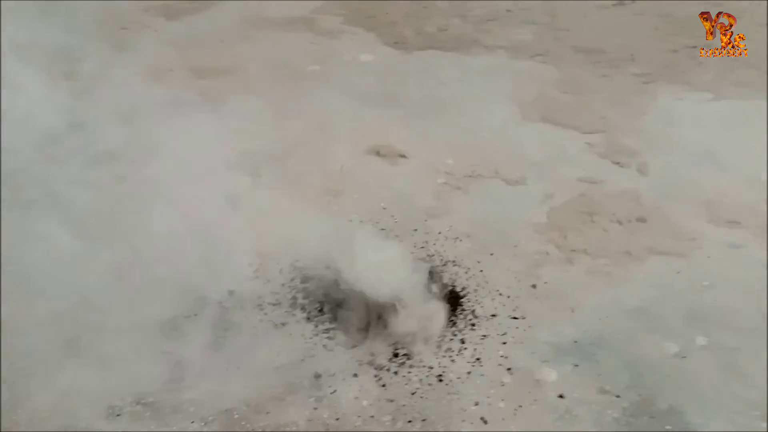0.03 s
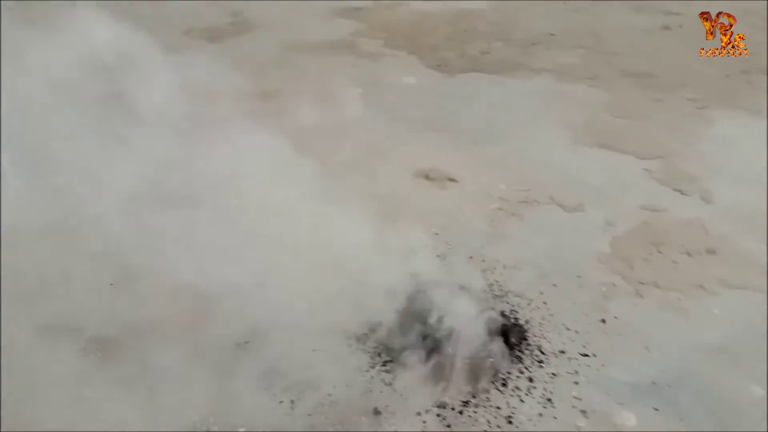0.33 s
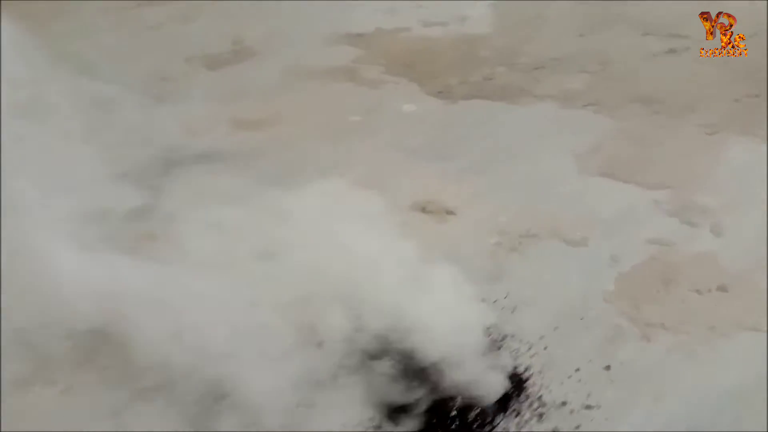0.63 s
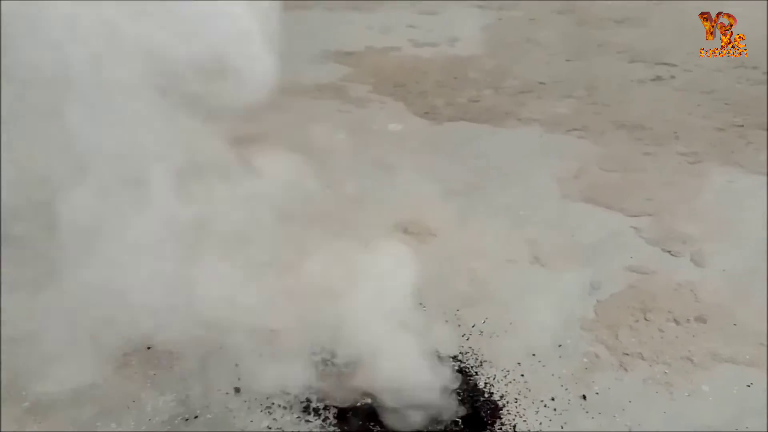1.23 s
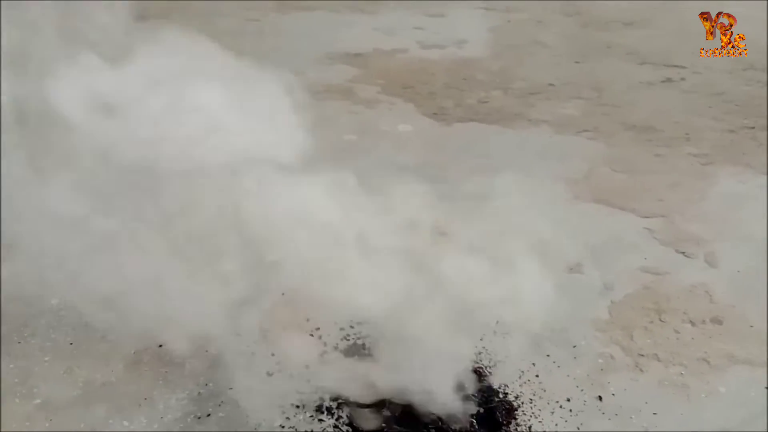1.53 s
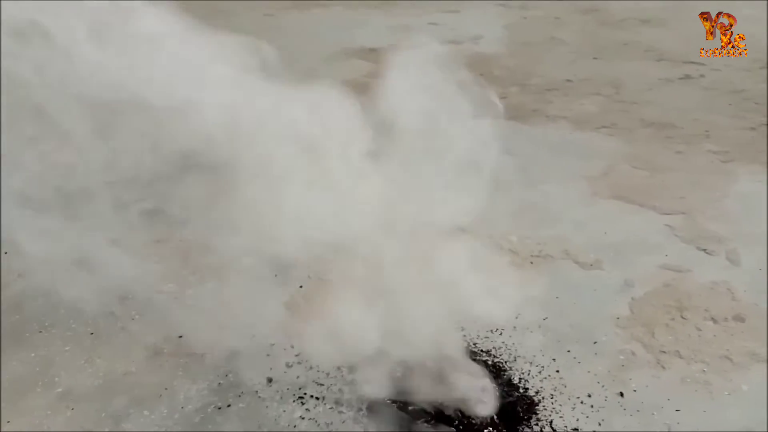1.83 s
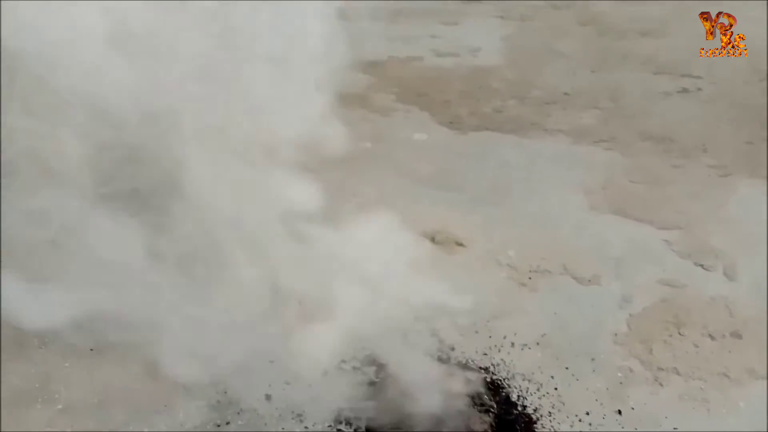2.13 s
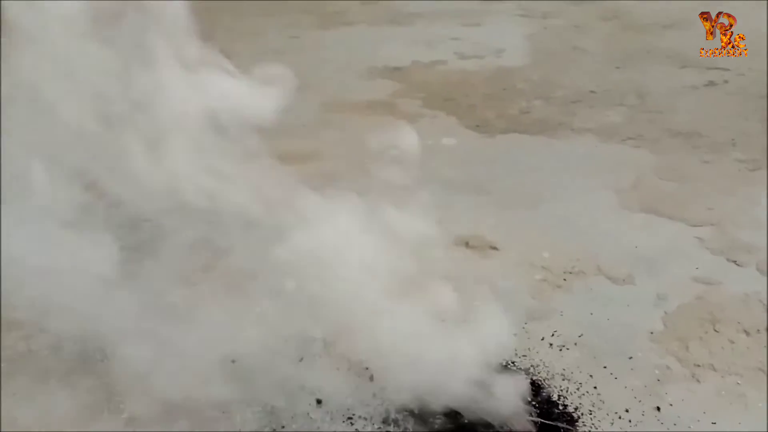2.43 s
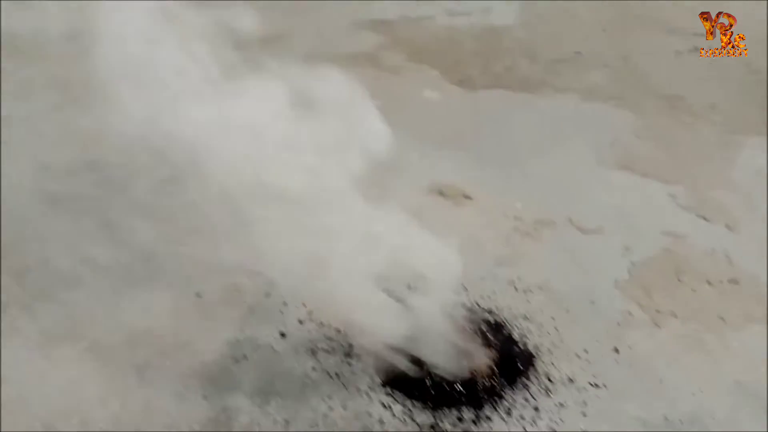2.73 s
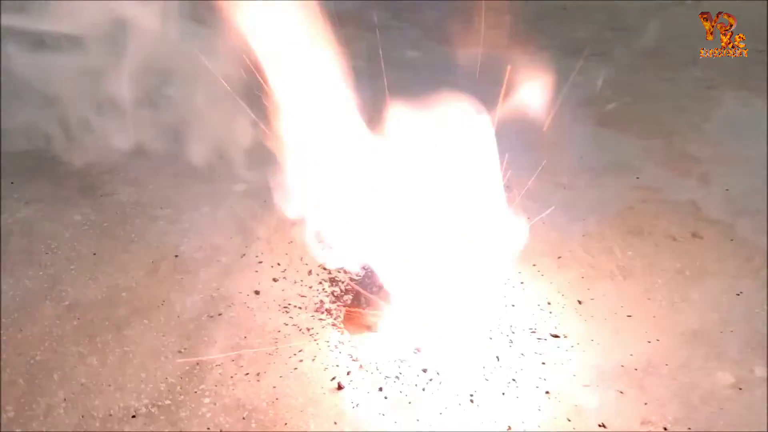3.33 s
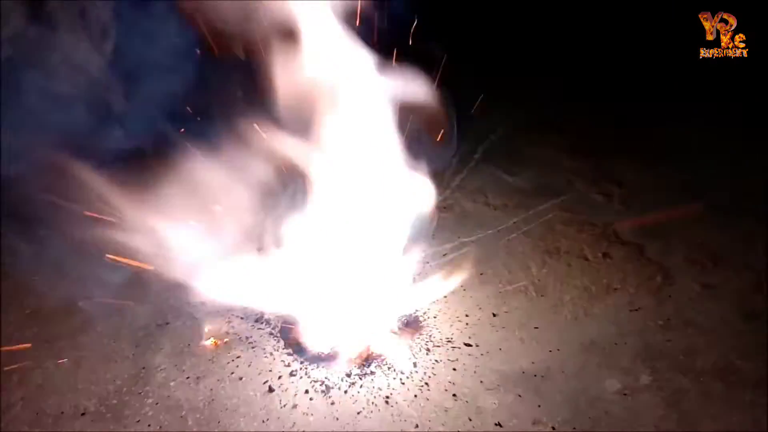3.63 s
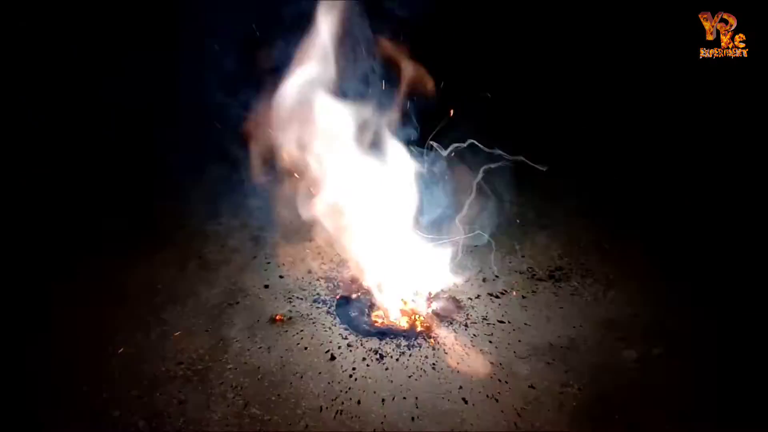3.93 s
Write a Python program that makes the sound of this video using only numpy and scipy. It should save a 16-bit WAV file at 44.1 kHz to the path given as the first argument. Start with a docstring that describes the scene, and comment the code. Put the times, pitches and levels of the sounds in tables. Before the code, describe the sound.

A reacting chemical pile sizzles close to the microphone on a concrete floor, hissing in spurts while bubbles crackle and pop. Near the end it catches fire, roaring in surges with crackling sparks and a low rumble.

```python
"""A reacting chemical pile seethes close by on a concrete floor, spitting gas in spurts.
Its froth sizzles, tiny bubbles crackle, and bigger ones burst with sharp pops, a few with a thump.
Just after three seconds it catches fire: burning gas roars in surges and throws crackling sparks.
Behind it are a fine fizz, a low rumble of churning air and flame, and a faint echo."""
import sys
import numpy as np
from scipy import signal
from scipy.fft import rfft, irfft
from scipy.io import wavfile

SR = 44100
rng = np.random.default_rng(int(sys.argv[2]) if len(sys.argv) > 2 else 0)


def wrap_up_sound(samples):
    """Save the sound to the file named by the first command line argument, as 16-bit audio."""
    columns = np.atleast_2d(samples).T
    # keep every value between -1 and 1, then stretch to whole-number steps
    tamed = np.clip(columns, -1, 1)
    steps = np.round(tamed * 32767).astype(np.int16)
    wavfile.write(sys.argv[1], SR, steps)


N = 176400
TIME = np.arange(N) / SR   # seconds

# Spurts of gas: (start [s], end [s], relative froth level [dB], relative hiss level [dB])
SPURTS = [(0, 0.353, -31.5, -33.5), (0.382, 0.467, -27.5, -26), (0.505, 0.599, -28.5, -26),
          (0.659, 0.815, -32, -27.5), (0.839, 0.917, -29.5, -28), (0.965, 1.075, -28.0, -28.5),
          (1.08, 1.311, -30, -28.5), (1.361, 1.414, -31, -28.5), (1.48, 1.583, -31, -27.5),
          (1.631, 1.716, -29, -25), (1.769, 1.836, -30.5, -23.5), (1.901, 1.939, -32, -30.5),
          (1.988, 2.11, -34, -22.5), (2.131, 2.246, -29.0, -25), (2.272, 2.33, -30, -27.5),
          (2.388, 2.423, -27.5, -31), (2.457, 2.559, -30, -32), (2.584, 2.699, -30.5, -29),
          (2.746, 2.868, -32, -34.5), (2.843, 2.991, -30.0, -31.5), (3.105, 3.206, -29, -30)]
# A "tone" lists how strong each frequency is. Bubbling froth: (frequency [Hz], relative level [dB])
FROTH_TONE = [(250, -21), (500, -17.5), (900, -14.5), (1400, -11), (2000, -10.5), (2600, -7), (3050, -1),
              (3450, 2), (3900, -6), (4500, -12), (5300, -13.5)]
# Tone of the escaping gas: (frequency [Hz], relative level [dB])
HISS_TONE = [(3800, -18), (4700, -27), (5400, -17.5), (5950, -4), (6700, 1), (7500, 1), (8600, -4),
             (9700, -6.5), (11200, -22), (15000, -13.5)]
def seething():
    """Each spurt makes the froth bubble, the gas hiss and tiny bubbles crackle."""
    froth, gas = from_db(-38), from_db(-34)   # lulls between spurts
    rise_s, fall_s = 0.03, 0.025
    for start, end, froth_db, hiss_db in SPURTS:
        fade_in = np.clip((TIME - start) / rise_s + .5, 0, 1)
        fade_out = np.clip(1 - (TIME - end) / fall_s, 0, 1)
        sag = from_db(np.interp(TIME, [start, end], [.5, -.5]))
        spurt = fade_in * fade_out * sag
        froth = np.maximum(froth, from_db(froth_db) * spurt)
        gas = np.maximum(gas, from_db(hiss_db) * spurt)
    tiny_bursts = rms_one(clicks(per_s=6000, spread_db=4.5))
    flow = tiny_bursts + from_db(-4) * turbulence(flutter_db=3)
    sizzle = froth * with_tone(flow, FROTH_TONE) + gas * with_tone(flow, HISS_TONE)
    return from_db(-4) * sizzle + crackle(froth)


# Ringing colour the microphone gives pops, crackle and sparks: (frequency [Hz], relative level [dB])
MIC_TONE = [(60, -28.5), (200, -34), (500, -26.5), (1400, -15), (2000, -15), (2600, -6), (3000, -3),
            (3400, 3), (3900, -3.5), (4500, -11), (5400, -25), (6000, -7), (6800, -5.5), (7700, -10.5),
            (8600, -18.5), (9700, -13), (11500, -25.5), (15000, -21.5)]
def crackle(froth):
    """Small bubbles burst as fine crackle and scattered spits, more often when the froth is loud."""
    activity = (froth / froth.mean()) ** 0.8
    fine = sum(with_tone(clicks(500 / 3 * activity, spread_db=5), MIC_TONE, tilt) for tilt in (-3, 0, 3))
    spits = sum(with_tone(clicks(97 / 2 * activity, spread_db=2), MIC_TONE, tilt) for tilt in (0, 3.5))
    return from_db(-36) * rms_one(fine * np.sqrt(activity)) + from_db(-35) * rms_one(spits)


# Bigger bubbles bursting: (time [s], relative energy [dB], relative brightness [dB per octave])
POPS = [(0.235, -8, 9), (0.283, -15, 6), (0.3655, 14, -4), (0.4654, 12.5, 6), (0.5749, -7, 10),
        (0.5825, 2.5, -2), (0.6195, 4, -3), (0.64, -8, 8), (0.655, 6.5, 1), (0.7007, 1, -7),
        (0.7207, 2.5, -6), (0.7293, 0.5, 5.5), (0.7726, 0.5, 1), (0.7892, -11, -10), (0.7958, 7, -4),
        (0.8313, -0.5, 0), (0.8589, 1.5, -4.5), (0.8982, 2, 2), (0.9161, 2, 0), (0.9316, 6.5, -4.5),
        (0.996, -1, 1), (1.0091, 1, -3), (1.0778, 2.5, 2), (1.1078, 0.5, -1), (1.1656, 1, -2),
        (1.1897, 2.5, -5), (1.2007, 2.5, 2), (1.2504, 3.5, -1), (1.2731, 3.5, -4), (1.2878, 0.5, -1),
        (1.3267, 10, -2.5), (1.3861, -1, -2), (1.4157, 2.5, 1), (1.4336, -6, 7), (1.477, -2, -8),
        (1.5205, 1.5, -3), (1.5415, 1.5, 1), (1.5469, 3.5, -2), (1.5681, 1, 3), (1.603, 4.5, -2),
        (1.682, 1.5, 3), (1.7194, -2, 3), (1.7313, 2, 4), (1.7978, -0.5, 2), (1.8387, -1, -7),
        (1.8595, 2.5, -0.5), (1.8757, 5, -2.5), (1.9345, 5.5, -4), (1.9564, 7.5, 4), (2.0421, 4.5, -0.5),
        (2.0554, -10, 5), (2.1189, -2, 5), (2.1506, -5, 3), (2.1557, 2, 1), (2.1882, 4, -6),
        (2.2541, 3, -3), (2.3197, 4, -5), (2.3566, 0.5, 2.5), (2.3834, 1, -5), (2.4163, -0.5, 1),
        (2.5092, 1.5, -2.5), (2.5693, 5, 2.5), (2.613, 0.5, -3), (2.6678, 5.5, -10.5), (2.7806, -1.5, -4),
        (2.983, 1, -7), (3.0548, -6, -3), (3.0632, -4, -10.5), (3.084, 2.5, -1), (3.1132, 0.5, -0.5),
        (3.2022, -1, 13), (3.476, -2, -13), (3.488, -2, -2), (3.5235, -1, 5), (3.5435, 0.5, 6),
        (3.5741, 0.5, 3), (3.6126, 0, 3), (3.6561, 0, 1), (3.682, 4, 2), (3.76, 2, -5), (3.8198, 4, -7),
        (3.8343, 5.5, -2), (3.8648, -4, -1), (3.8985, 1.5, -1), (3.9357, 4, 6), (3.9772, 0, 1)]
def pops():
    """Each bubble bursts with a tick and a short spray, which ring in the microphone."""
    out = np.zeros(N)
    for start, db, tilt_db in POPS:
        ring = ringing(MIC_TONE, tilt_db + 2.5)
        add(out, start, db + 1, burst(ring, spray_db=-8, spray_s=0.0013))
    return out


# Tiny dry snaps and sparks: (time [s], relative energy [dB])
SNAPS = [(0.1887, -12), (0.2825, -5), (0.5744, -5), (0.6401, -1), (1.4333, -14), (1.8026, -3),
         (2.0568, -5.0), (2.143, -13), (2.4444, -9.5), (2.4738, -6), (2.702, -7), (2.7102, -9), (2.78, 3),
         (2.8018, -7.5), (2.8172, -5), (2.8458, -7), (2.857, -10.0), (2.93, -10), (3.019, -2), (3.0633, 2),
         (3.2773, -5), (3.475, 2), (3.4885, -3), (3.5003, -6), (3.525, -11), (3.5437, -4), (3.5535, 0.5),
         (3.5948, -5.0), (3.605, -1), (3.6122, 3), (3.6409, 1), (3.6668, -3.5), (3.6954, -2), (3.8764, -11),
         (3.9652, 4), (3.975, -9), (3.9811, -2.0), (3.9916, -4.0)]
# Tone of a snap: (frequency [Hz], relative level [dB])
SNAP_TONE = [(800, -2), (2200, -2), (3400, 9), (5200, -29), (6800, -25), (8500, -3.5), (10000, 9.5),
             (12000, -0.5), (15000, 3)]
def snaps():
    """Tiny grains snap, thinner and brighter than the bubbles."""
    out = np.zeros(N)
    ring = ringing(SNAP_TONE)
    for start, db in SNAPS:
        add(out, start, db + 1.5, burst(ring, spray_db=4, spray_s=0.00046))
    return out


# Puffs of gas from the largest bubbles: (time [s], energy [dB])
PUFFS = [(0.367, -13), (0.4649, -14), (1.9559, 2.5), (2.6675, -9)]
# Tone of a puff: (frequency [Hz], relative level [dB])
PUFF_TONE = [(30, -15), (55, -6.5), (90, 3), (150, -3), (300, -4.5), (700, -11), (1500, -8), (2500, -16)]
def puffs():
    """A large bubble lets out its gas with a low thump that dies quickly."""
    pushes = np.zeros(N)
    for start, db in PUFFS:
        pushes[int(start * SR)] = -from_db(db)
    return signal.fftconvolve(pushes, ringing(PUFF_TONE, size=8192))[:N]


IGNITION_S = 3.1
BURNING = np.clip((TIME - IGNITION_S) / 0.026, 0, 1)   # 0 before the fire, 1 once it is lit
# Surges of the flame: (time [s], relative roar level [dB], relative rush level [dB])
SURGES = [(3.11, -32, -25), (3.15, -29, -23), (3.21, -31.5, -26), (3.25, -25.5, -14), (3.29, -34, -25.5),
          (3.32, -19.5, -19), (3.37, -22, -16), (3.42, -28, -18.5), (3.5, -33, -25.5), (3.58, -36.5, -33),
          (3.7, -30, -28), (3.73, -28, -17.5), (3.8, -27.5, -18), (3.86, -32, -26), (4, -33, -26)]
# Pockets of gas flaring up: (time [s], peak level [dB])
FLARES = [(3.131, -32), (3.34, -15), (3.665, -23.5)]
# Tone of the broad roar: (frequency [Hz], relative level [dB])
ROAR_TONE = [(120, -8), (200, 0.5), (280, -5.5), (350, 1.5), (560, -2.5), (690, 0.5), (950, -1.5),
             (1170, -1.5), (1420, 2), (1700, -6), (1850, -5.5), (2150, -12), (2500, -4), (3400, -24)]
# Tone of the rushing jet: (frequency [Hz], relative level [dB])
RUSH_TONE = [(1800, -7.5), (2600, -6), (3130, 6), (3300, 2.5), (3470, 7.5), (3800, 1), (4300, -7.5),
             (5300, -9), (6200, -8), (6650, -13), (7000, 1.5), (7400, -9), (8100, -4.5), (9200, -15.5),
             (10300, -10.5), (11200, -18), (15000, -20)]
def flame():
    """Swirling, burning gas roars and suddenly flares, while its jet adds a brighter rush."""
    roar_db, rush_db = in_time(SURGES)
    strength = from_db(roar_db + 1)
    flare_rise_s = 0.0041
    for start, db in FLARES:
        age = np.maximum(TIME - start, 0) / flare_rise_s
        flare = from_db(db) * age * np.exp(1 - age)
        strength = np.hypot(strength, flare)   # their powers add
    roar = strength * with_tone(turbulence(flutter_db=2.5), ROAR_TONE)
    rush = from_db(rush_db - 3) * with_tone(turbulence(flutter_db=1.5), RUSH_TONE)
    return BURNING * (roar + rush)


def sparks():
    """The flame throws crackling sparks that grow steadily louder."""
    growth = np.clip(TIME - IGNITION_S, 0, 1)
    return from_db(-26) * growth * with_tone(clicks(per_s=600, spread_db=2.5), MIC_TONE, tilt_db=4.5)


# Loudness of the fine fizz: (time [s], relative level [dB])
FIZZ_LEVEL = [(0, -46), (.36, -47), (.45, -56), (1.0, -57), (1.35, -57), (1.9, -51), (2.1, -47), (2.6, -49),
              (3.0, -41), (3.3, -45), (3.5, -34.5), (3.75, -35.5), (4, -27.5)]
# Tone of the fizz: (frequency [Hz], relative level [dB])
FIZZ_TONE = [(4000, -11), (5500, 4), (7000, 0.5), (8800, -0.5), (10300, 5), (12000, 5.5), (15000, -2.5)]
def fizz():
    """Very fine, bright clicks blur into a fizz, loudest once sparks fly."""
    level_db, = in_time(FIZZ_LEVEL)
    return from_db(level_db + 3.5) * with_tone(clicks(per_s=4300, spread_db=7), FIZZ_TONE)


# Loudness of the rumble, in two lists joined end to end: (time [s], relative level [dB])
RUMBLE_LEVEL = [
    [(0.0, -36), (0.02, -38), (0.362, -43), (0.378, -46.5), (1.476, -51), (1.512, -46), (1.614, -57),
     (1.652, -49), (1.722, -43), (1.748, -70), (1.796, -45.5), (1.92, -56)],
    [(2.02, -60), (2.042, -57), (2.262, -50.5), (2.852, -62), (2.902, -42), (3.078, -68), (3.122, -40.5),
     (3.42, -31), (3.536, -40), (3.69, -32.5), (3.976, -35.5), (4.0, -47)],
]
# Tone of the churning air: (frequency [Hz], relative level [dB])
AIR_RUMBLE_TONE = [(20, -26), (40, -27), (60, -6), (85, -1), (120, 2), (160, 1.5), (220, -6), (320, -15.5),
                   (420, -10), (700, -24.5), (1500, -43)]
# Tone of the flame's rumble: (frequency [Hz], relative level [dB])
FLAME_RUMBLE_TONE = [(20, -33), (45, -27), (65, -10.5), (100, -6), (132, 1.5), (147, -0.5), (165, 1.5),
                     (195, -4), (240, -10.5), (330, -7.5), (600, -33)]
def rumble():
    """Low churning of the air gives way to the rumble of the flame."""
    level_db, = in_time(np.vstack(RUMBLE_LEVEL))
    air = from_db(0.5) * with_tone(rng.standard_normal(N), AIR_RUMBLE_TONE, size=16384)
    fire = from_db(-1) * with_tone(rng.standard_normal(N), FLAME_RUMBLE_TONE, size=16384)
    return from_db(level_db) * ((1 - BURNING) * air + BURNING * fire)


def echoes(sound):
    """The surroundings scatter the sound into a short, faint tail."""
    t = TIME[:SR // 2]
    tail = rng.standard_normal(len(t)) * from_db(-60 * t / 0.54)   # fades at 60 dB per 0.54 s
    return from_db(-16) * signal.fftconvolve(sound, energy_one(tail))[:N]


def from_db(db):
    """Turn decibels into a number to multiply by."""
    return 10 ** (np.asarray(db) / 20)


def rms_one(x):
    """Scale a sound so its average level (rms) is 1."""
    return x / np.sqrt(np.mean(x ** 2) + 1e-20)


def energy_one(x):
    """Scale a sound so its total energy is 1."""
    return x / np.sqrt(np.sum(x ** 2))


def in_time(rows):
    """Join a table's points with straight lines, giving a value at every sample."""
    times, *columns = np.transpose(rows)
    return [np.interp(TIME, times, column) for column in columns]


def ringing(tone, tilt_db=0, size=2048):
    """One click with the given tone; tilt_db brightens it per octave from 1470 to 11000 Hz."""
    hz, db = np.transpose(tone)
    octave, listed = np.log2(np.fft.rfftfreq(size, 1 / SR) + 1), np.log2(hz)
    octaves_outside = np.abs(octave - np.clip(octave, listed[0], listed[-1]))
    brightening = tilt_db * np.clip(octave, np.log2(1470), np.log2(11000))
    shape_db = np.interp(octave, listed, db) + brightening - 24 * octaves_outside
    # Move the energy to the start, so the click hits first and rings after (minimum phase).
    cepstrum = irfft(np.log(from_db(shape_db)))
    cepstrum[1:size // 2] *= 2
    cepstrum[size // 2 + 1:] = 0
    return energy_one(irfft(np.exp(rfft(cepstrum))))


def with_tone(sound, tone, tilt_db=0, size=2048):
    """Filter a sound to give it a tone, at an average level of 1."""
    return rms_one(signal.fftconvolve(sound, ringing(tone, tilt_db, size))[:N])


def turbulence(flutter_db, flutter_hz=133):
    """Swirling gas: noise whose loudness flutters at random."""
    r = np.exp(-2 * np.pi * flutter_hz / SR)
    smooth_noise = signal.lfilter([1], [1, -2 * r, r * r], rng.standard_normal(N + SR))
    flutter = rms_one(smooth_noise)[SR:]
    return rng.standard_normal(N) * from_db(flutter_db * flutter)


def clicks(per_s, spread_db):
    """Random clicks, many small and a few large."""
    sizes = from_db(spread_db * np.minimum(rng.exponential(1, N), 4.5))
    signs = rng.choice([-1, 1], N)
    return sizes * signs * (rng.random(N) < per_s / SR)


def burst(ring, spray_db, spray_s):
    """One sharp click and a dying spray of noise, both given the same ring."""
    t = TIME[:SR // 100]
    spray = rng.standard_normal(len(t)) * np.exp(-t / spray_s)
    spray = from_db(spray_db) * energy_one(spray)
    spray[0] = 1   # the click
    return signal.fftconvolve(spray, ring)


def add(out, start_s, energy_db, sound):
    """Mix in a short sound at a given time and energy."""
    i = int(start_s * SR)
    out[i:i + len(sound)] += from_db(energy_db) * energy_one(sound)[:N - i]


def scene():
    """The pile seethes and pops, then catches fire."""
    pile = seething() + pops() + snaps() + puffs() + flame() + sparks() + fizz()
    return (pile + echoes(pile) + rumble())[None]


def record(dry):
    """Loud peaks briefly turn the volume down and are rounded off; the highest treble is cut."""
    threshold_db, release_db_per_s, attack_s = -8, 181, 0.006
    excess_db = np.maximum(20 * np.log10(np.abs(dry[0]) + 1e-9) - threshold_db, 0)
    release = release_db_per_s * TIME
    held_db = np.maximum.accumulate(excess_db + release) - release   # each peak fades away steadily
    r = np.exp(-1 / (attack_s * SR))
    smooth_db = signal.lfilter([1 - r], [1, -r], held_db)
    dipped = dry * from_db(-0.2 * smooth_db)
    rounded = dipped / (1 + (dipped / 3.24) ** 4) ** .25
    treble_cut = signal.firwin(201, 15650, window="blackman", fs=SR)
    return signal.fftconvolve(rounded, treble_cut[None], "same")


dry = scene()
out = record(dry)
wrap_up_sound(out)
```